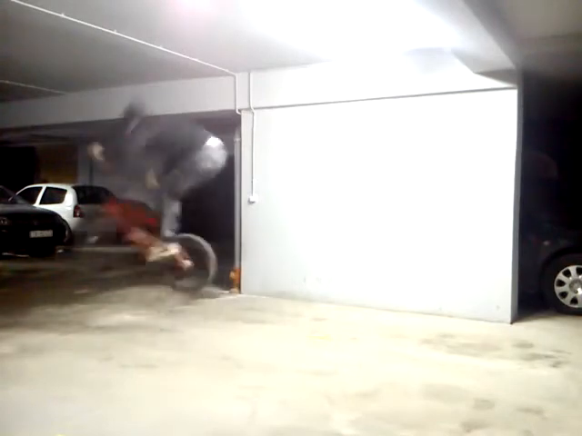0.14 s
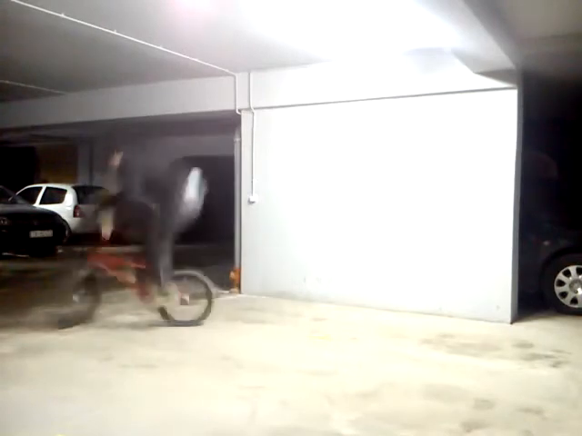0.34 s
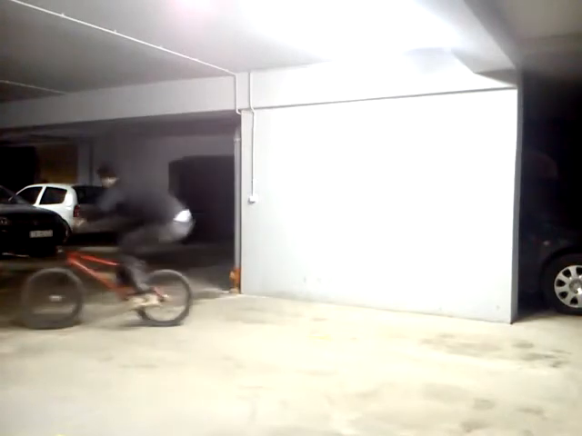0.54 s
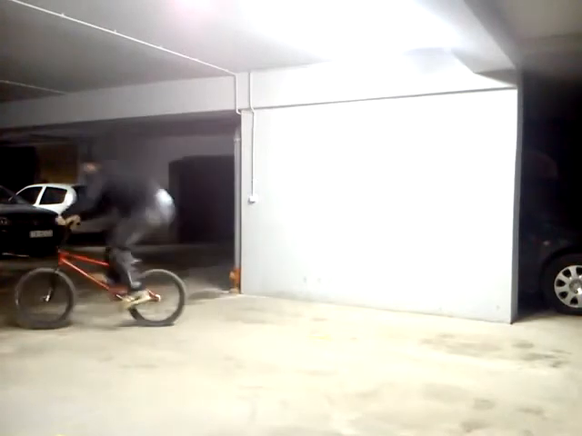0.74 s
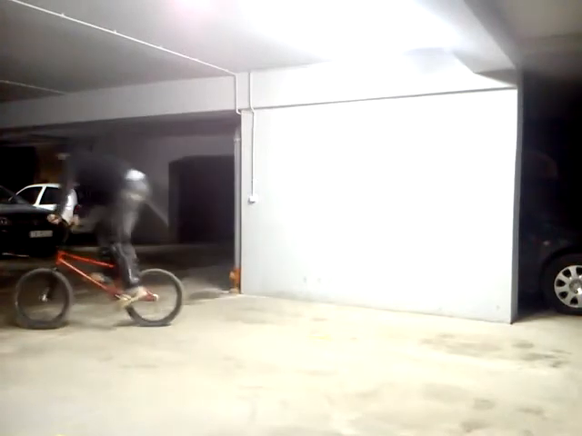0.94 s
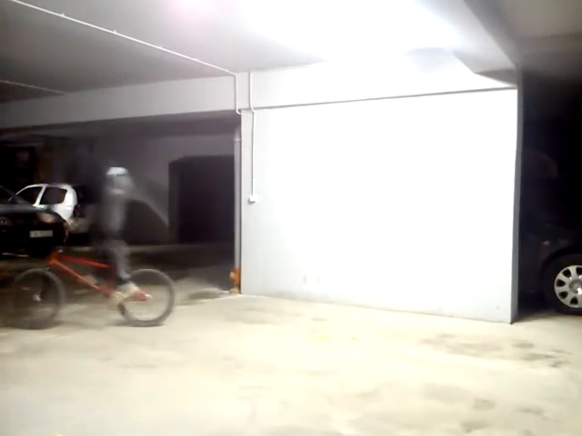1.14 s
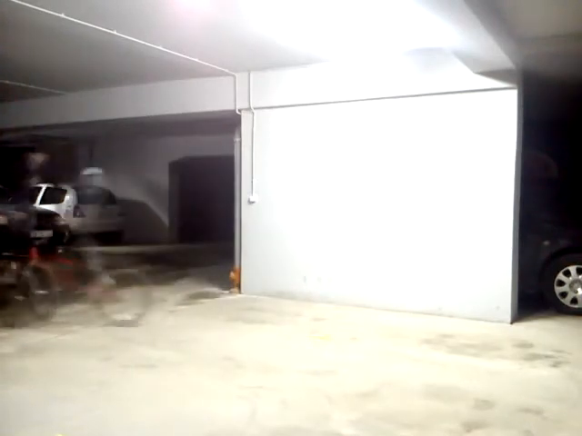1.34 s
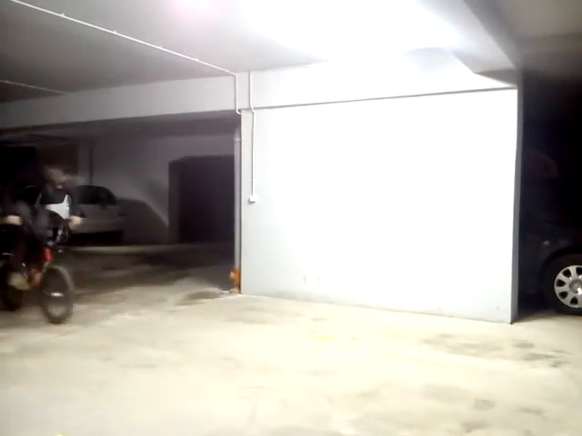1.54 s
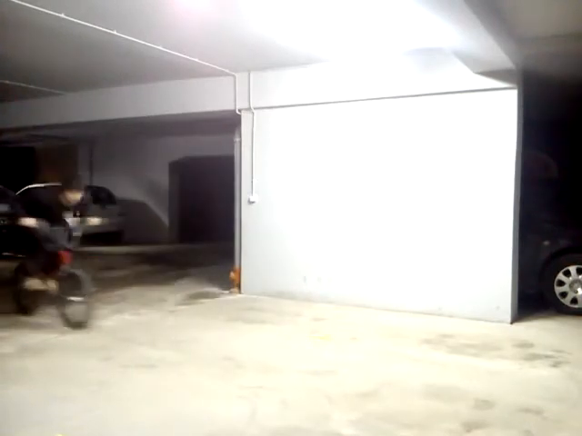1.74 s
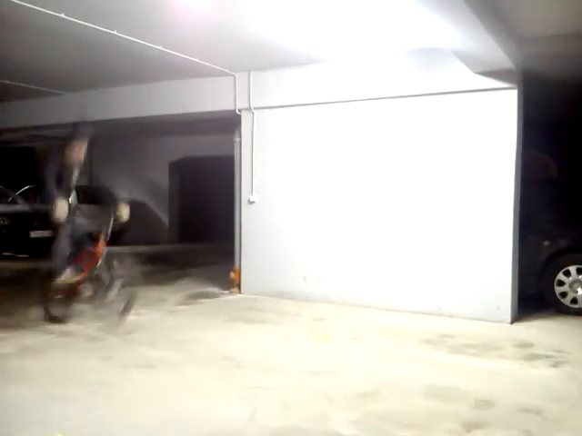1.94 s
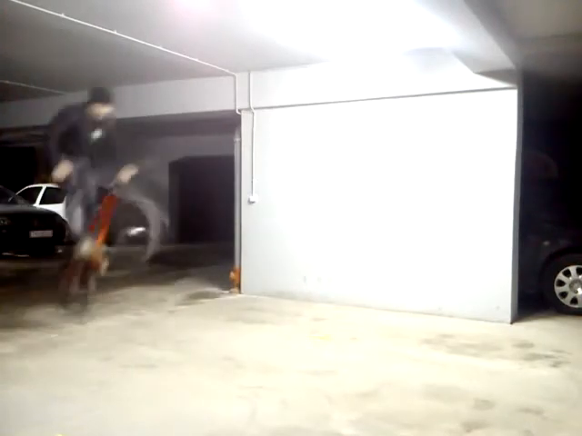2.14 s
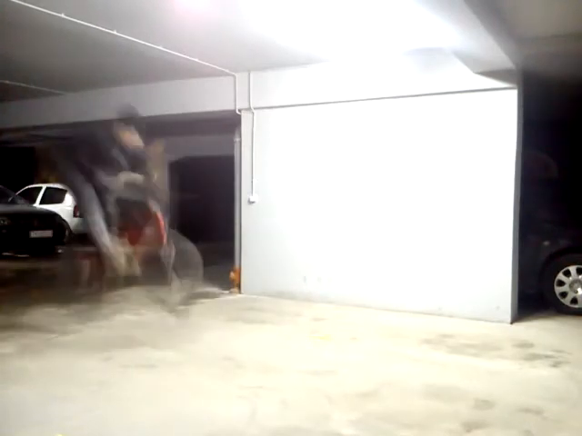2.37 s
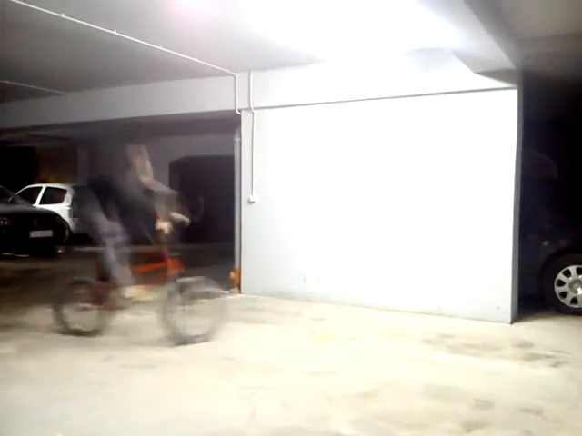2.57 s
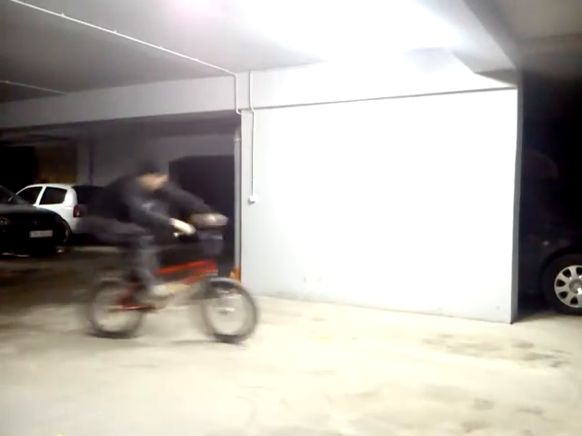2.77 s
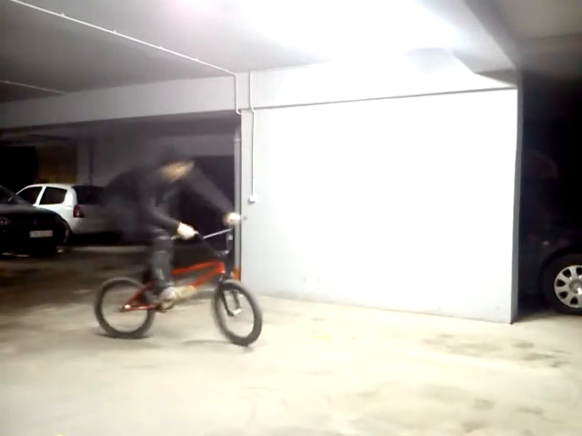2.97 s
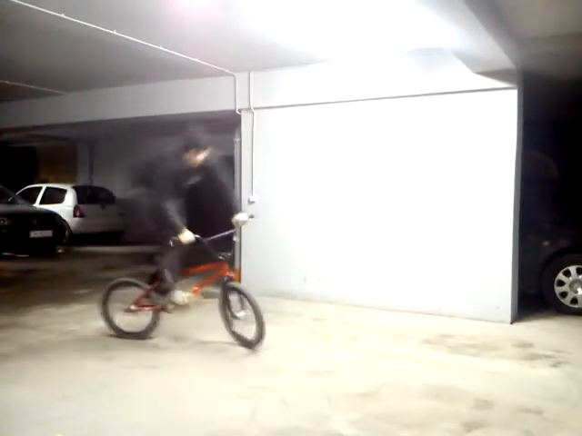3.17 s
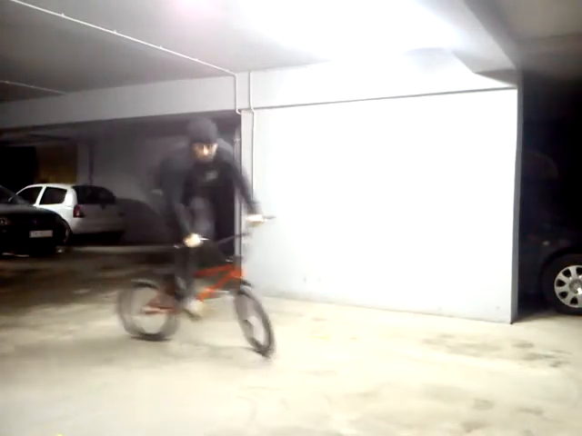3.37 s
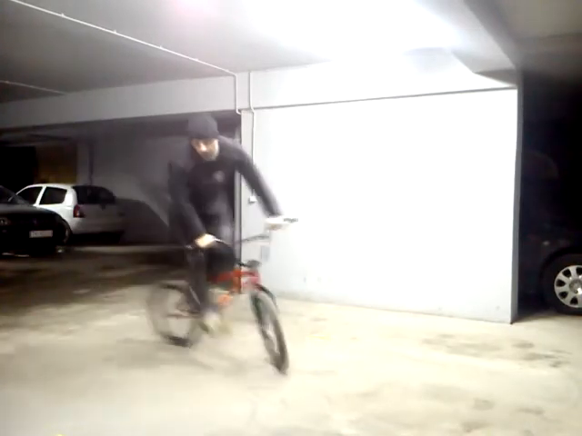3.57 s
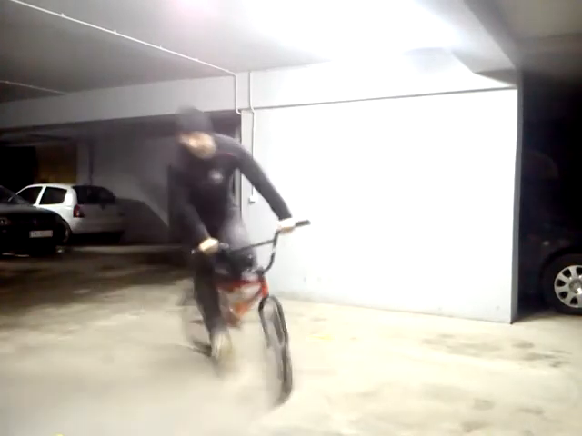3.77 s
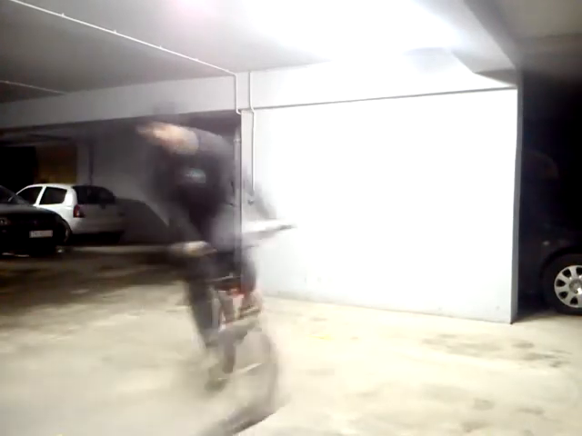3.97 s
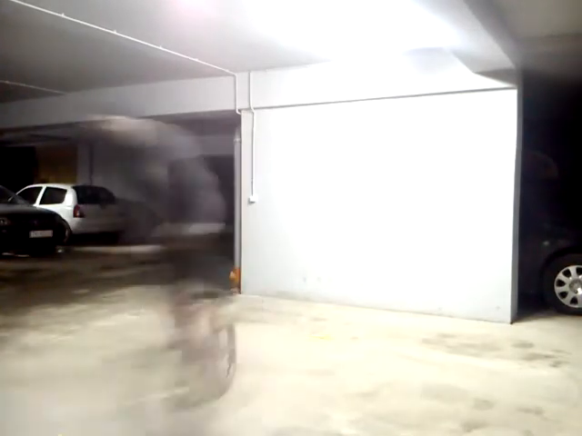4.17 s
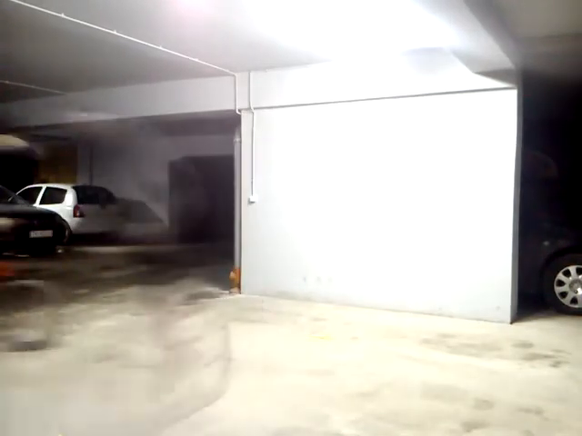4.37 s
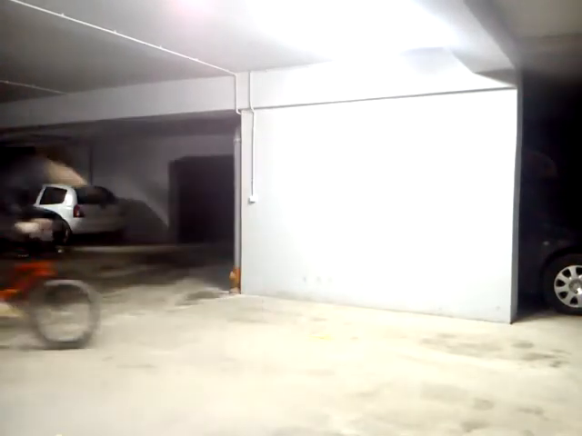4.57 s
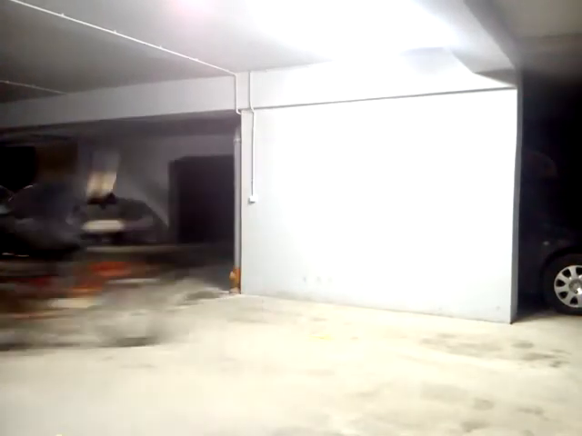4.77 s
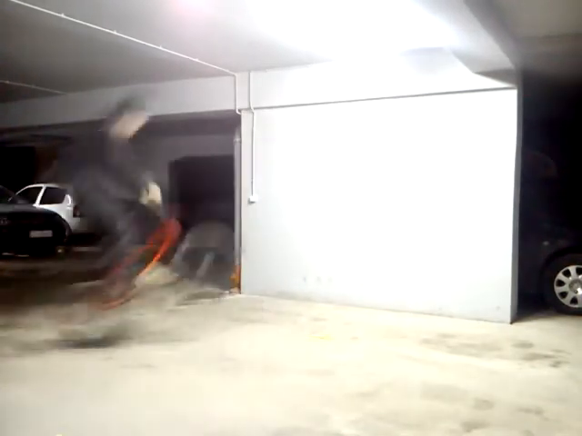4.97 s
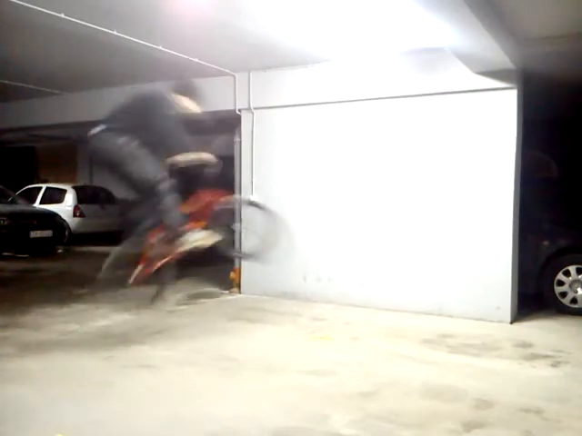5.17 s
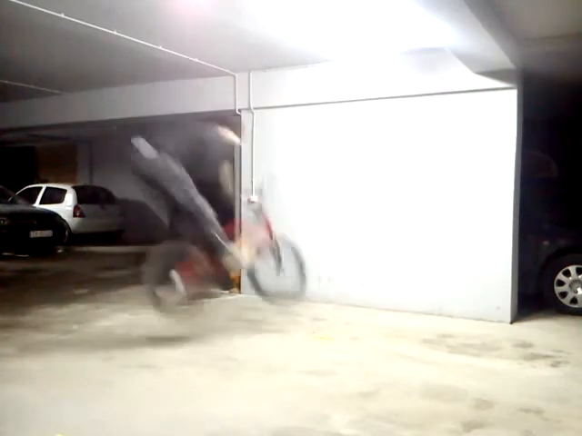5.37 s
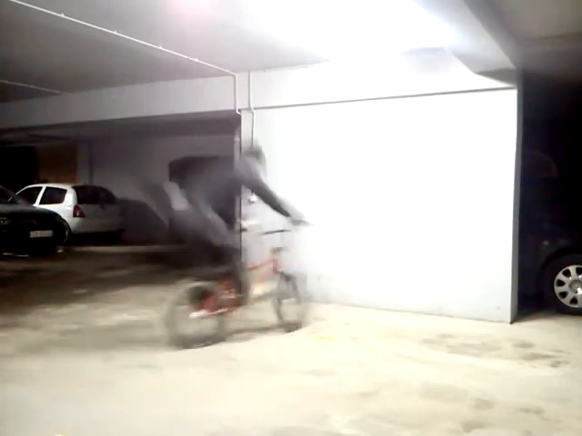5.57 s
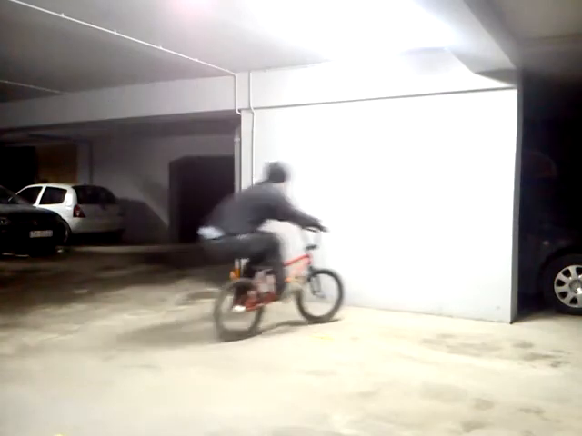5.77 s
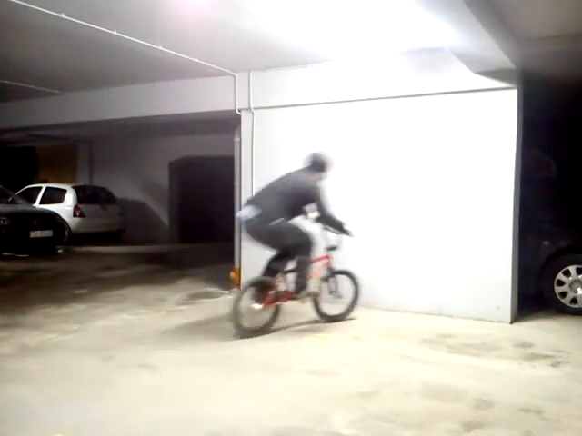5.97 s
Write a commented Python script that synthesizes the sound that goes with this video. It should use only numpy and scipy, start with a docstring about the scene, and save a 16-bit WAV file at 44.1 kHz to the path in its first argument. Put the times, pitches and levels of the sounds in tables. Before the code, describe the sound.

A bicycle hops in a low concrete garage, heard from a distance with a long echo over faint hiss and a deep ventilation hum. The freewheel sizzles at the start, and at 0.3 seconds the bike lands with a sharp volley of tyre, rim and frame knocks, a thud, a chain rattle and a low boom from the hall. The freewheel buzzes in spells from about 1 second. A soft take-off thump near 1.9 leads to a second landing at 2.5, with lightly ringing spokes. The front tyre scrubs faintly until about 3.3. Quiet tyre rolling and more freewheel buzz follow from 3.7, with a small chain jingle. Near 5 seconds a tyre gives a brief, faint groan at take-off, and at 5.5 comes the loudest landing, with clearly ringing spokes and two light chain jingles as the echo fades.

```python
"""BMX hops in an underground garage

One small microphone in a low concrete hall, far enough off for the echoes to smear everything. A rider
hops three times. Each landing is a quick volley of blows (tyres, rims, frame) with a thud, a chain
rattle and ringing spokes, and the hall booms at its standing waves. In between, the freewheel's pawls
sizzle and the tyres roll, over quiet room tone and a faint ventilation hum."""
import sys
import numpy as np
from scipy import signal
from scipy.fft import rfft, irfft
from scipy.io import wavfile
from scipy.ndimage import uniform_filter1d

SR = 44100
rng = np.random.default_rng(int(sys.argv[2]) if len(sys.argv) > 2 else 0)


def wav_record(signal):
    """Record a signal, one row per channel, as 16-bit PCM in the file named by sys.argv[1]."""
    frames = np.transpose(np.atleast_2d(signal))
    bounded = np.clip(frames, -1, 1)
    # unit amplitude maps onto the largest positive 16-bit level
    quanta = np.round(bounded * 32767).astype(np.int16)
    wavfile.write(sys.argv[1], SR, quanta)


N = 265041

# reverberation of the garage: freq_hz, t60_s
HALL_T60 = [(60, 2.23), (150, 1.5), (400, 0.7), (800, 1.51), (1600, 1.76), (3000, 1.59), (5000, 1.19),
            (8000, 0.64), (14000, 0.48)]
# first reflections off floor, ceiling and near walls: delay_s, level_db
REFLECTIONS = [(.0021, -7.5), (.0058, -4), (0.0111, 0), (.019, -12.5)]
# standing waves of the garage: pitch_hz, level_db, t60_s
HALL_MODES = [(45, -13, 1.2), (53.4, 0, 1.9), (57, -11, 1.5), (74, -10, 1.1), (136, -4, .9)]

# spectra of the sources: freq_hz, relative_db
ROOM_TONE_COLOUR = [(15, 3), (30, -23), (53, -13), (75, -21), (130, -20), (300, -21), (1270, -23),
                    (3750, -23.5), (6200, -28), (9400, -24.5), (13500, -34.5), (15500, -42)]
PAWL_COLOUR = [(1200, -31), (2100, -9.5), (2800, -6.5), (4800, -3.5), (6200, -5), (8000, 2), (11000, -3.5),
               (12500, -6), (14000, -1.5), (15700, -15.5)]
THUMP_COLOUR = [(50, -4), (130, 4.5), (230, 6), (380, 5.5), (520, 0), (1000, -20), (3000, -47)]
ROLL_COLOUR = [(60, -2), (130, -16), (210, 6.5), (380, 5.5), (520, 1), (850, 1.5), (1300, 0.5), (1700, 4),
               (2400, -3), (5000, -15)]
BLOW_COLOUR = [(35, -29), (60, 0.5), (102, -11.5), (135, 2), (183, -17), (226, -3), (376, -2), (559, -6.5),
               (849, -5.5), (1380, -10), (1700, -8.5), (1960, -14), (5840, -20), (10900, -28.5),
               (15500, -48)]
CHAIN_COLOUR = [(1000, -13), (3000, -4), (5500, -6), (8000, -2.5), (11000, -3), (13000, -9), (15700, -13.5)]

# the rider stops pedalling and the freewheel runs: start_s, length_s, level_db, swell_db_per_s, low_ring_db
COASTS = [(-.2, .5, -48.5, -1, -3), (0.968, 0.49, -56.5, 20.5, -5), (1.612, 0.34, -48.5, 17, -3),
          (2.123, 0.55, -47.5, 11, -5), (3.23, 0.56, -63.5, 8.5, -28), (3.747, 0.26, -52, 2, -8),
          (4.031, 0.41, -50, 5, -5), (4.59, 0.33, -43, -0.5, -6), (5.062, 0.4, -47.5, -1.5, -3.5)]
# a flick of the bike makes the hub louder for a moment: centre_s, gain_db
FLICKS = [(.04, 4), (.265, 5), (1.71, 2.5), (1.885, 3.5), (2.25, 4.5), (3.47, 0.5), (4.85, 1.5),
          (5.21, 3.5), (5.39, 3)]
# stretches within each hop when the free-spinning hub rings lower: start_s, end_s
FREE_SPINS = [(0, 0.24), (2.14, 2.36), (5.06, 5.5)]
# hub shell resonances (high; low under load; low spinning free): pitch_hz, width_hz, level_db
HUB_HIGH = [(7250, 420, 0), (8350, 1100, -5), (9550, 1200, -3), (10600, 1300, -5)]
HUB_LOADED = [(3350, 400, -4), (3750, 400, -3), (4130, 320, 0)]
HUB_FREE = [(3020, 280, -1), (3500, 500, -4), (4110, 400, -1)]

# tyres shoved into the floor at take-off: start_s, level_db, length_s, boom_db
SHOVES = [(0.029, -63, 0.084, -58), (1.803, -60, 0.068, -81), (1.884, -51, 0.048, -51),
          (4.829, -53, 0.079, -71)]
# rider and frame jolt in mid-air: start_s, level_db, length_s
JOLTS = [(0.143, -59.5, 0.19), (2.317, -64, 0.23), (5.29, -61.5, 0.22)]
# tyres rolling, in the run-ups and past the microphone: start_s, length_s, level_db, swell_db_per_s
ROLLS = [(1.68, 0.27, -63.5, 23), (3.73, 0.61, -63.5, -9), (4.66, 0.29, -61, -6)]
# the front tyre scrubs through the turn: start_s, length_s, level_db, swell_db_per_s
SCRUBS = [(2.8, 0.52, -66, -1)]
# a tyre groans as it leaves the floor: start_s, level_db, length_s
GROAN = (4.965, -56, .1)

# landings: touch_s, slam_s, rebound_s, level_db, treble_db, rebound_db, boom_db, rattle_db,
# spoke_pitch_hz, spoke_db, spoke_t60_s
LANDINGS = [(0.3164, 0.34, .397, -10.5, -9, -2.5, -39, -30.5, 1500, -52, 1.2),
            (2.513, 2.5262, 2.592, -12, -12.5, -10.5, -37.5, -32, 1760, -46.5, 1.9),
            (5.497, 5.511, 5.548, -8, -10, -8, -34, -27.5, 1120, -33.5, 0.84)]
# blows in each stage, relative to their landing: delay_s, level_db, treble_db, tyre_knock_db
TOUCH = [(0, -8.5, -1.5, -12.5), (.006, -8, 2, -23)]  # tyre, then rim
SLAM = [(0, .5, -0.5, -15.5), (.008, 1, 2.5, -20.5), (.02, -2, -3.5, -23)]  # tyre, rim, frame
REBOUND = [(0.00039, -1.4, -9, -11)]  # the tyre alone, dull
# hollow knock of an inflated tyre: pitch_hz, level_db, t60_s
TYRE_MODES = [(237, 0, .07), (300, -3, .05), (387, -1, .08)]
# ringing of frame and rims: pitch_hz, level_db, t60_s
METAL_MODES = [(763, -3, .15), (820, -3, .15), (960, -5, .15), (1141, -3, .2), (1231, -4, .2),
               (1460, -5, .2), (1700, -4, .2), (1863, -5, .15), (2279, -9, .12), (2482, -8, .1),
               (3096, -6, .12), (4199, -7, .08), (4899, -3, .07), (5662, 1, .07), (5850, -1, .05)]
# brief jingles of the chain: start_s, level_db, length_s
JINGLES = [(.828, -56, 0.022), (2.72, -47.5, 0.045), (3.775, -50.5, 0.047), (5.78, -45, 0.023),
           (5.94, -47, 0.021)]

TYRE_ATTACK_S, TYRE_RELEASE_T60_S = 0.14, 0.82


def undb(db):
    """Decibels to gain."""
    return 10 ** (np.asarray(db) / 20)


def clock():
    """Time of every sample, in seconds."""
    return np.arange(N) / SR


def unit(x):
    """Scale to rms 1."""
    return x / np.sqrt(np.mean(x ** 2))


def fade(t60, t):
    """Exponential decay, 60 dB down at t60."""
    return np.exp(-np.log(1000) * t / max(t60, 1e-3))


def add(out, start_s, x):
    """Mix x into out from start_s on."""
    i = max(int(start_s * SR), 0)
    out[i:i + len(x)] += x[:N - i]


def through(x, response):
    """Pass x through an impulse response."""
    return signal.fftconvolve(x, response)[:N]


def colour(x, points, size=4096):
    """Minimum-phase filter of unit power through (freq_hz, relative_db) points."""
    hz, db = np.transpose(points)
    bins_hz = np.arange(size // 2 + 1) * SR / size
    gain = undb(np.interp(np.log(bins_hz + 1), np.log(hz), db))
    cepstrum = irfft(np.log(unit(gain)))
    log_spectrum = rfft(2 * cepstrum[:size // 2], size) - cepstrum[0]
    return through(x, irfft(np.exp(log_spectrum)))


def resonate(x, peaks):
    """Parallel resonances (pitch_hz, width_hz, level_db)."""
    return sum(undb(db) * signal.lfilter(*signal.iirpeak(hz, hz / width, fs=SR), x)
               for hz, width, db in peaks)


def ring(modes, t, spread_db):
    """Decaying modes; each blow strikes another spot and so weights them differently."""
    chance = rng.standard_normal((len(modes), 2))
    return sum(undb(db + spread_db * luck) * np.sign(side) * np.sin(2 * np.pi * hz * t) * fade(t60, t)
               for (hz, db, t60), (luck, side) in zip(modes, chance))


def clicks(per_s, spread_db):
    """Random clicks of uneven size, rms 1."""
    hits = rng.random(N) < per_s / SR
    return unit(hits * rng.standard_normal(N) * undb(spread_db * rng.standard_normal(N)))


def swells(rows):
    """Gain of short half-sine bursts (start_s, level_db, length_s)."""
    t = clock()
    return sum(undb(db) * np.sin(np.pi * np.clip((t - s) / length, 0, 1)) for s, db, length, *_ in rows)


def runs(rows, attack_s, release_t60_s):
    """Gain of sustained sounds: attack, a hold sloping through level_db at its middle, release."""
    t, power = clock(), 0
    for start, length, db, db_per_s in rows:
        age = np.maximum(t - start, 0)
        held = np.minimum(age, length)
        hold = undb(db + db_per_s * (held - length / 2))
        power += (hold * (1 - fade(attack_s, age)) * fade(release_t60_s, age - held)) ** 2
    return np.sqrt(power)


def hall(tail_db=4, early_db=3, early_t60_s=0.11, build_s=0.0034):
    """Path from one spot to the microphone: direct sound, reflections, dense ceiling echoes, long tail."""
    t = np.arange(2 ** 16) / SR
    hz, t60s = np.transpose(HALL_T60)
    spectrum = rfft(rng.standard_normal(len(t)))
    log_hz = np.log(np.linspace(1, SR / 2, len(spectrum)))
    tail = sum(irfft(spectrum * np.interp(log_hz, np.log(hz), band)) * fade(t60, t)
               for band, t60 in zip(np.eye(len(hz)), t60s))
    early = rng.standard_normal(len(t)) * fade(early_t60_s, t)
    diffuse = undb(tail_db) * unit(tail) + undb(early_db) * unit(early)
    response = diffuse * (1 - fade(build_s, t)) / np.sqrt(len(t))
    direct = (0.000096, 0.019)
    for delay, db in [direct, *REFLECTIONS]:
        response[int(delay * SR)] += undb(db)
    return response / np.sqrt(np.sum(response ** 2))


def moving(x, spots, hop=2048):
    """A travelling source crossfades round the spots, so its echo pattern keeps changing."""
    out, place = np.zeros(N), np.arange(N) / hop
    for k, response in enumerate(spots):
        share = np.clip(1 - abs((place - k + 1) % len(spots) - 1), 0, 1)
        out += through(x * np.sqrt(share), response)
    return out


def room_tone(level_db, waver_db, hum_hz, hum_db):
    """Still garage air with the microphone's own hiss and a faint, deep ventilation hum."""
    steps = np.repeat(rng.standard_normal(N // 4096 + 1), 4096)[:N]
    waver = unit(uniform_filter1d(steps, 4096))
    hum = undb(hum_db) * unit(np.sin(2 * np.pi * hum_hz * clock()))
    return colour(rng.standard_normal(N), ROOM_TONE_COLOUR) * undb(level_db + waver_db * waver) + hum


def pawl(spots, teeth_per_s=946, jitter=.28, spread_db=3):
    """One pawl snaps unevenly over the ratchet teeth; the hall blurs the snaps together."""
    wobble = np.repeat(rng.standard_normal(N // 128 + 1), 128)[:N]
    teeth = np.cumsum(teeth_per_s * (1 + jitter * wobble)) / SR
    snaps = np.diff(np.floor(teeth), prepend=0) > 0
    return moving(snaps * rng.choice([-1, 1], N) * undb(spread_db * rng.standard_normal(N)), spots)


def freewheel(spots, low_db, gain_db, flick_width_s=0.062):
    """Three pawls sizzle and ring the hub shell, whose low resonances drop for a stretch of each hop."""
    t = clock()
    first, second, third = (pawl(spots) for _ in range(3))
    sizzle = unit(unit(colour(first, PAWL_COLOUR)) + unit(resonate(second, HUB_HIGH)))
    spinning_free = sum(1. * ((t >= start) & (t < end)) for start, end in FREE_SPINS)
    free = uniform_filter1d(spinning_free, size=2048)
    low = free * unit(resonate(third, HUB_FREE)) + (1 - free) * unit(resonate(third, HUB_LOADED))
    # the small shell radiates little below its first resonance
    shell_band = signal.butter(2, [2600, 5200], "band", fs=SR, output="sos")
    low = undb(low_db) * unit(signal.sosfilt(shell_band, low))
    flick_db = sum(db * np.exp(-((t - s) / flick_width_s) ** 2) for s, db in FLICKS)
    hub = sum((sizzle + undb(ring_db) * low) * runs([coast], attack_s=0.32, release_t60_s=1)
              for *coast, ring_db in COASTS)
    return undb(gain_db + flick_db) * hub


def thumps():
    """Dull bursts as the tyres are shoved down at take-off and the bike jolts in mid-air."""
    return colour(rng.standard_normal(N), THUMP_COLOUR) * swells(SHOVES + JOLTS)


def hall_boom(build_s, shove_db_per_octave):
    """Standing waves build up after each landing; a light take-off shove favours the higher ones."""
    t, out = clock()[:2 * SR], np.zeros(N)
    for _, slam_s, _, _, _, _, boom_db, *_ in LANDINGS:
        add(out, slam_s, undb(boom_db) * ring(HALL_MODES, t, spread_db=2.5) * (1 - fade(build_s, t)))
    top_hz = HALL_MODES[-1][0]
    light = [(hz, db + shove_db_per_octave * np.log2(hz / top_hz), t60) for hz, db, t60 in HALL_MODES]
    for start, _, length, boom_db in SHOVES:
        add(out, start, undb(boom_db) * ring(light, t, spread_db=1) * np.minimum(t / length, 1))
    return out


def tyre_roll(rustle_db):
    """Rubber rumbles over gritty concrete; the same grainy noise is the rustle of mid-air jolts."""
    gain = runs(ROLLS, TYRE_ATTACK_S, TYRE_RELEASE_T60_S) + undb(rustle_db) * swells(JOLTS)
    return unit(colour(clicks(per_s=900, spread_db=0.5), ROLL_COLOUR)) * gain


def volley():
    """Blow by blow: one wheel touches, the other slams down, the bike rebounds."""
    for touch_s, slam_s, rebound_s, db, treble_db, rebound_db, *_ in LANDINGS:
        stages = [(touch_s, db, TOUCH), (slam_s, db, SLAM), (rebound_s, db + rebound_db, REBOUND)]
        for start, stage_db, stage in stages:
            for delay, blow_db, bright_db, tyre_db in stage:
                yield start + delay, stage_db + blow_db, treble_db + bright_db, tyre_db


def blows(spots, crack_db, tick_db, clatter_db, clatter_t60_s, rise_s, metal_db, split_hz):
    """Each knock shakes loose parts into a brief clatter; tyre and metal ring on into the hall."""
    t, out = clock()[:SR // 2], np.zeros(N)
    soft, hard = (signal.butter(1, split_hz, kind, fs=SR) for kind in ("low", "high"))
    knock = 1. * (t == 0)
    clatter_gain = undb(clatter_db) * fade(clatter_t60_s, t) * (1 - fade(rise_s, t))
    for k, (start, db, treble_db, tyre_db) in enumerate(volley()):
        clatter = clatter_gain * rng.standard_normal(len(t))
        # the rubber cushions the knock, so most of the treble comes from the clatter
        body = signal.lfilter(*soft, knock + clatter)
        treble = signal.lfilter(*hard, undb(tick_db) * knock + undb(19.5) * clatter)
        crack = undb(crack_db) * colour(body + undb(treble_db) * treble, BLOW_COLOUR)[:len(t)]
        tyre = undb(tyre_db) * ring(TYRE_MODES, t, spread_db=1)
        metal = undb(treble_db + metal_db) * ring(METAL_MODES, t, spread_db=1)
        add(out, start, undb(db) * through(crack + tyre + metal, spots[k % len(spots)]))
    return out


def chain(rise_s=.02, t60_s=.65):
    """Links start to chatter as the first wheel touches, and jingle when the pedals jerk them."""
    t, shake = clock()[:SR], swells(JINGLES)
    for touch_s, _, _, _, _, _, _, rattle_db, *_ in LANDINGS:
        add(shake, touch_s, undb(rattle_db) * fade(t60_s, t) * np.minimum(t / rise_s, 1))
    return shake * colour(clicks(per_s=2100, spread_db=0.5), CHAIN_COLOUR)


def thud(pitch_hz, level_db, t60_s):
    """The squashed tyres push out a slow pressure wave as the second wheel slams down."""
    t, out = clock()[:2 * SR], np.zeros(N)
    for _, slam_s, *_ in LANDINGS:
        add(out, slam_s, -undb(level_db) * np.sin(2 * np.pi * pitch_hz * t) * fade(t60_s, t))
    return out


def spokes(detune, count=36):
    """The spokes of the wheel that takes the load ring on, each tensioned a little differently."""
    t, out = clock()[:3 * SR // 2], np.zeros(N)
    for _, slam_s, *_, hz, db, t60 in LANDINGS:
        wheel = [(hz * (1 + detune * offset), db, t60) for offset in rng.standard_normal(count)]
        add(out, slam_s, ring(wheel, t, spread_db=1) / np.sqrt(count))
    return out


def tyre_scrub():
    """The front tyre slips on the smooth floor in the turn: tiny clicks ringing in a narrow band."""
    slips = clicks(per_s=2800, spread_db=5)
    scrub = resonate(resonate(slips, [(1630, 250, 0)]), [(1665, 400, 0)])
    return unit(scrub) * runs(SCRUBS, TYRE_ATTACK_S, TYRE_RELEASE_T60_S)


def tyre_groan(pitch_hz):
    """One short tone from a tyre leaving the floor."""
    return np.sin(2 * np.pi * pitch_hz * clock()) * swells([GROAN])


def scene():
    """Bike and garage at the one microphone, the same in both channels."""
    spots = [hall() for _ in range(8)]
    mono = blows(spots, crack_db=7.5, tick_db=18.5, clatter_db=-13.5, clatter_t60_s=0.031,
                 rise_s=0.015, metal_db=-22.5, split_hz=4300)
    mono += moving(chain(), spots[:3]) + spokes(detune=.09)
    mono += thud(pitch_hz=38.8, level_db=-26, t60_s=0.109)
    mono += hall_boom(build_s=0.29, shove_db_per_octave=7)
    mono += freewheel(spots, low_db=-4, gain_db=1)
    tyres = tyre_roll(rustle_db=-1) + tyre_scrub() + thumps()
    mono += moving(tyres, spots[:3]) + tyre_groan(pitch_hz=310)
    mono += room_tone(level_db=-57.5, waver_db=0.5, hum_hz=53.8, hum_db=-77.5)
    return np.array([mono, mono])


def record(dry):
    """The recorder cuts steeply above 15.5 kHz."""
    return signal.sosfilt(signal.ellip(10, .2, 80, 15500, fs=SR, output="sos"), dry)


dry = scene()
out = record(dry)
wav_record(out)
```